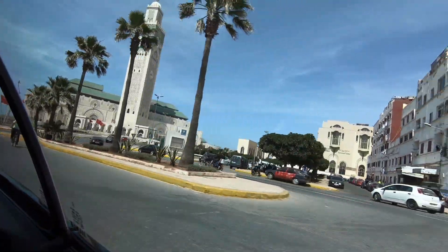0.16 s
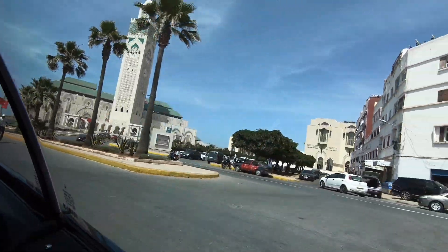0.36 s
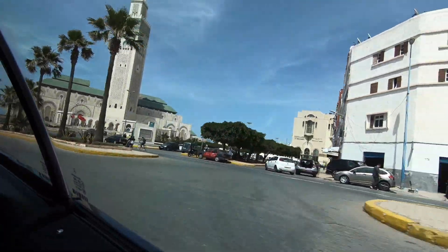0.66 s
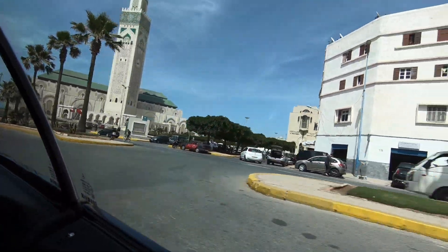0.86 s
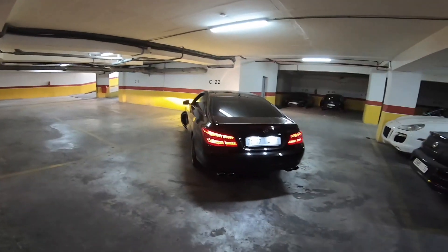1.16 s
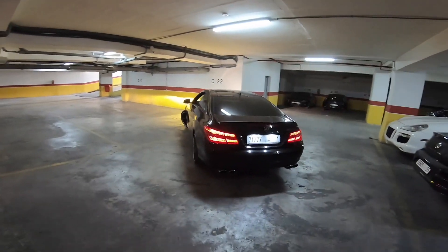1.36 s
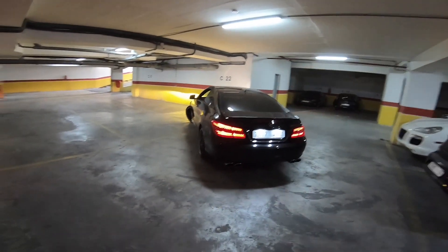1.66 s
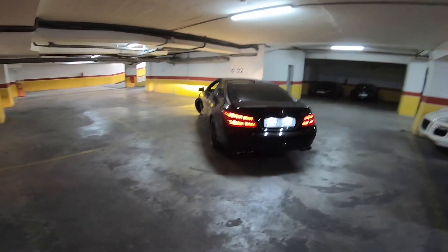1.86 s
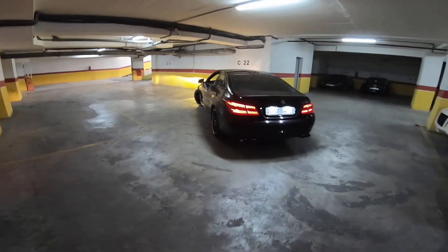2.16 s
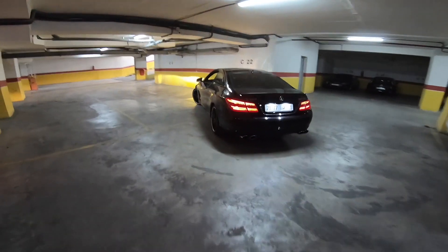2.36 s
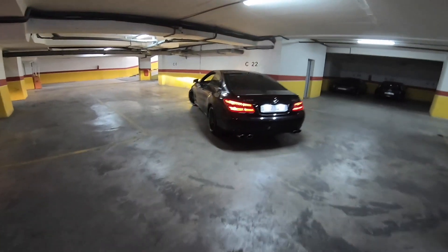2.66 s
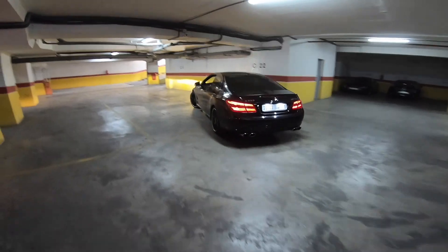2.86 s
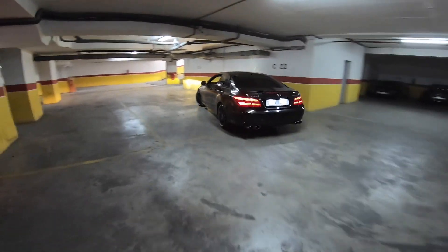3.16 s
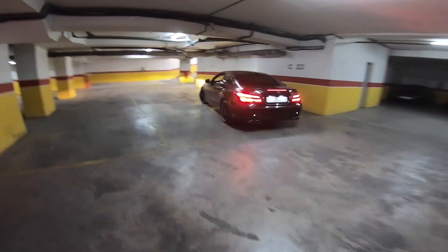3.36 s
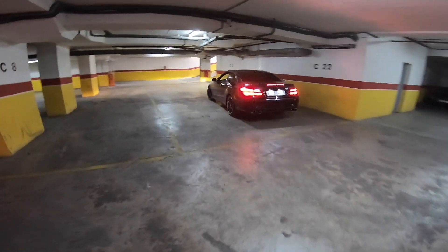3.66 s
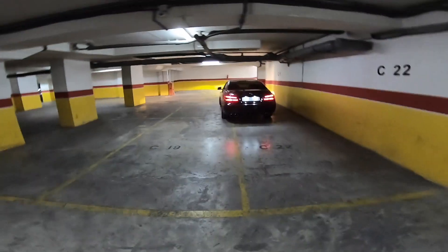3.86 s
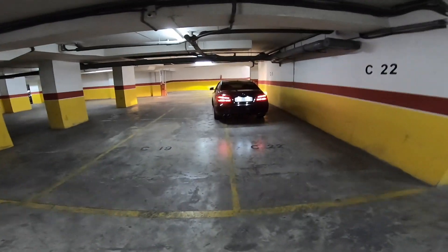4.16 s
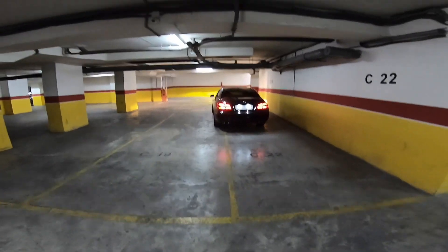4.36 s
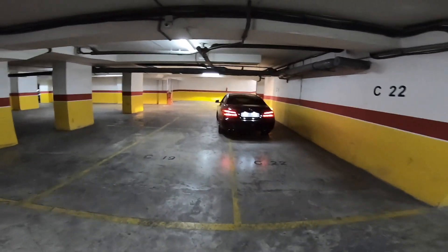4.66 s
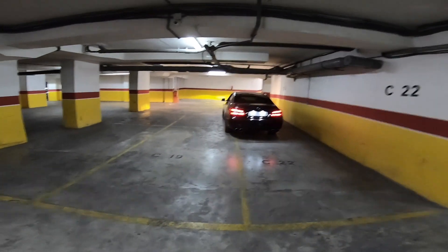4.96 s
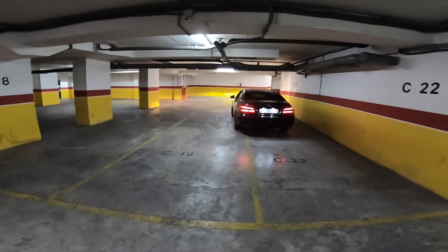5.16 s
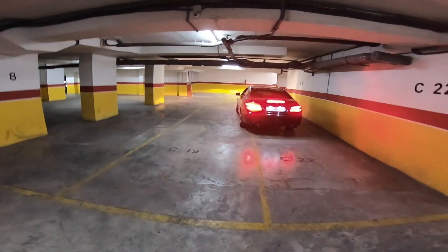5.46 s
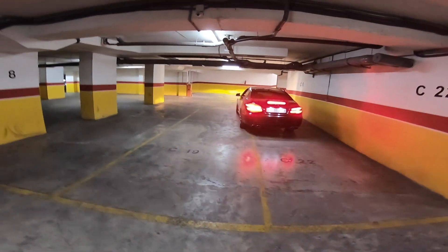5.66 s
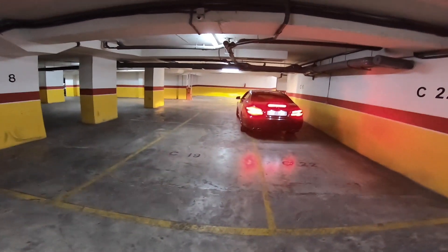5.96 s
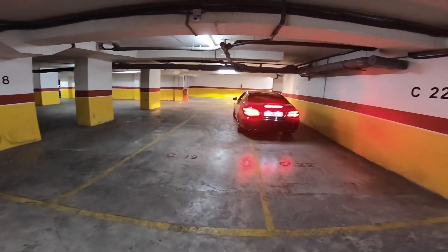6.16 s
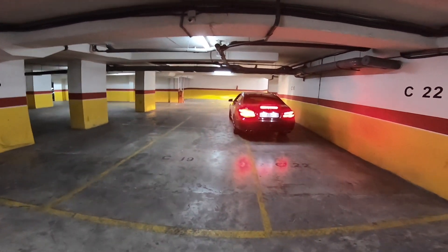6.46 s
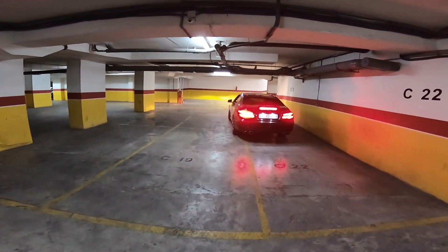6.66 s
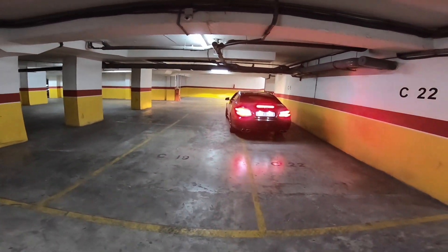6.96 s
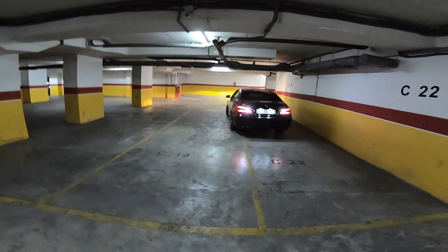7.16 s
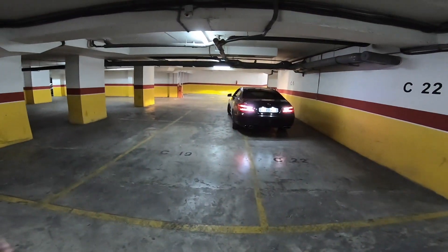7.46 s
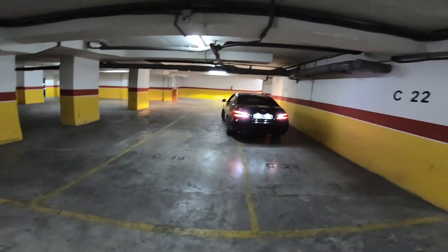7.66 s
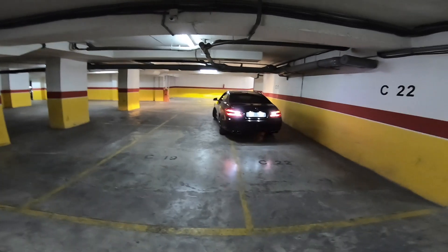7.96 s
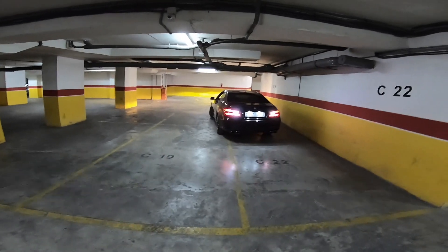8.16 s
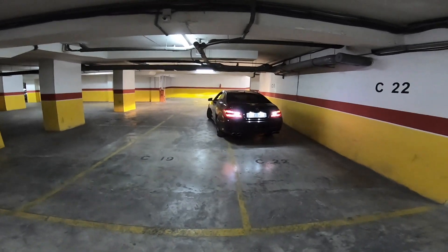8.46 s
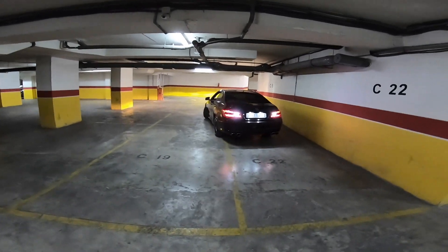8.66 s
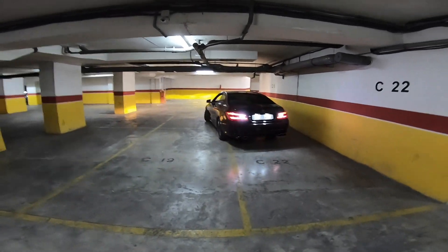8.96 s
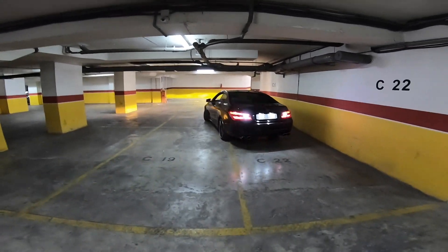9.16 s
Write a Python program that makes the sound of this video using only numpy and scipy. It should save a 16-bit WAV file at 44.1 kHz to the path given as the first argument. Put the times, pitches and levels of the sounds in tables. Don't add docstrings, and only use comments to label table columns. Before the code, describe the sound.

One second of road: loud low engine hum fading under buffeting wind, small rattles and one heavy microphone knock. Then, in a reverberant underground garage with a handheld microphone behind the car, a V8 burbles away, chirps its tyres and revs up. After a cut it stands farther off, idles, barks twice with crackling pops, winds down slowly and rumbles unevenly, with airy hiss and a faint whistle.

```python
import sys
import numpy as np
from scipy import signal
from scipy.fft import rfft, irfft, next_fast_len
from scipy.io import wavfile
from scipy.ndimage import uniform_filter1d, minimum_filter1d, map_coordinates

SR = 44100
rng = np.random.default_rng(int(sys.argv[2]) if len(sys.argv) > 2 else 0)


def linear_from_db(decibels):
    return 10 ** (np.asarray(decibels, float) / 20)


def waveform_to_disk(signal):
    frames = np.transpose(np.atleast_2d(signal))
    scaled = np.clip(frames, -1, 1) * 32767
    samples = np.round(scaled).astype(np.int16)
    wavfile.write(sys.argv[1], SR, samples)


N = 410571

# (frequency [Hz], density [dB per Hz])
STREET_LEVEL = [(0, -51), (.97, -50.5)]
STREET_SPECTRUM = [(350, -39), (600, -3), (843, -8.5), (933, -6), (1140, -13.5), (1280, -10), (1800, -20.5),
                   (6300, -44.5), (8500, -75), (19800, -120)]
# (time [s], level [dB])
WIND_STRENGTH = [(0, -26), (.12, -13), (.25, -19), (.38, -15.5), (.47, -19), (.66, -12.5), (.75, -13),
                 (0.831, -15), (0.972, -17)]
# (frequency [Hz], density [dB per Hz])
BUFFET_SPECTRUM = [(8, -39), (15, -12), (35, 6), (65, -1.5), (90, -26), (200, -120)]
FLAP_SPECTRUM = [(40, -58.5), (70, -8), (90, 5), (123, -7), (156, -2.5), (283, -22), (496, -32.5),
                 (600, -44.5), (900, -120)]
# (frequency [Hz], density [dB per Hz])
TRIM_RUSTLES = [(.31, .055, -67), (.46, 0.016, -71.5), (.65, 0.026, -71), (.74, 0.023, -71),
                (.8, .03, -67.5), (.89, 0.017, -66.5)]
TRIM_SPECTRUM = [(1800, -30), (3000, -6.5), (4500, 1), (6000, -3), (8200, -15.5), (9000, -60)]
# (time [s], push [dB], ripple [dB], snap [dB])
HOUSING_KNOCKS = [
    (.3, -40, -54, -56),
    (.45, -40, -60, -63),
    (.655, -40, -56, -61),
    (.737, -40, -54, -56),
    (.79, -40, -54, -58),
    (.825, -2.5, -20, -29),
    (.879, -40, -50, -54),
]
# (frequency [Hz], density [dB per Hz])
RUMBLE_LEVEL = [(.97, -31.5), (1.3, -33), (1.9, -35.5), (2.3, -38.5), (2.6, -48.5)]
RUMBLE_SPECTRUM = [(10, -25), (22, 0), (35, 11), (48, -8), (65, -56)]
# (frequency [Hz], width [Hz], level [dB])
BELT_LEVEL = [(.97, -56.5), (2, -63), (3.8, -66.5), (3.9, -54), (6.5, -62.5), (7.3, -60), (8, -58.5),
              (8.6, -50.5), (9.31, -53)]
BELT_RESONANCES = [(1760, 71, -5), (3167, 110, -6.5), (3870, 70, -16)]
# (time [s], level [dB])
FAN_LEVEL = [(.96, -43.5), (1.5, -45), (2.101, -49.5), (3.861, -50), (3.87, -46.5), (4.25, -47.5),
             (6.6, -52.5), (7.3, -48.5), (9.31, -44)]
# (time [s], level [dB])
SCRUB_LEVEL = [(2.75, -65), (2.92, -57), (3.0, -49), (3.18, -44.5), (3.3, -46.5), (3.42, -58), (3.6, -62)]
GRIND_LEVEL = [(4.5, -64), (4.6, -50.5), (4.68, -54.5), (4.76, -51.5), (4.84, -61)]
# (frequency [Hz], density [dB per Hz])
GRIND_SPECTRUM = [(1000, -29), (2200, -4.5), (3500, 2), (5000, -6.5), (7000, -6), (11000, -13),
                  (15500, -27.5)]
# (time [s], length [s], from [Hz], to [Hz], level [dB])
TYRE_SQUEAKS = [
    (2.555, .03, 1450, 2100, -46),
    (2.594, .025, 1520, 1480, -46),
    (2.61, .02, 1700, 1750, -49),
    (2.659, .016, 1760, 1740, -44),
]
# (time [s], peak [dB], lower part [dB])
PIPE_CRACKS = [(2.918, -48, 7), (3.021, -47, 7), (4.262, -42, 0), (4.272, -36, 3), (4.286, -40, 2),
               (4.352, -42, 5), (4.416, -41, 4), (4.464, -35, 0), (4.523, -36, 4), (4.576, -44, 2),
               (4.632, -45, 3), (4.68, -46, 2), (4.704, -40, 5), (4.755, -41, 4), (4.773, -42, 3),
               (4.795, -37, 3), (4.819, -38, 5), (4.839, -28, -3), (4.875, -27, -2), (4.906, -25.5, -2),
               (4.935, -31, 0), (4.95, -37, 0), (5.009, -40, 0), (6.59, -52, 5), (7.319, -46, -2)]
# (frequency [Hz], level [dB])
CRACK_SPECTRUM = [(600, -45), (1500, -3), (3200, -3.5), (4700, -8.5), (7000, -2.5), (10000, -14.5),
                  (15700, -33)]
# (frequency [Hz], density [dB per Hz])
GARAGE_DECAY = [(60, 1.2), (500, 1.48), (4000, 0.19), (12000, 0.07)]
GARAGE_DRONE = [(20, -36), (45, -11), (100, -1.5), (170, 3), (230, -4.5), (300, -17.5), (450, -62.5)]
# (time [s], cycle [Hz], level [dB]); cycle = firing rate / 8
ROAD_RUN = [
    (0, 31.73, -8.5),
    (.07, 30.58, -10),
    (.142, 31.63, -12.5),
    (.22, 30.47, -15),
    (.316, 29.96, -21.5),
    (.43, 29.3, -27.5),
    (.54, 27.8, -25.5),
    (.7, 27.8, -43),
    (.97, 26, -45),
]
# (multiple of the cycle [-], level [dB])
ROAD_ORDER_LEVELS = [(1, -11), (2, -24), (3, -2.5), (4, -0.5), (5, 0), (6, -7), (7, -28.5), (8, 3),
                     (9, -12), (10, -18), (11, -5.5), (12, -12), (13, -28.5), (14, -19.5), (15, -16),
                     (16, -17), (17, -25.5), (18, -33.5), (19, -26), (20, -30.5), (21, -32.5), (22, -42),
                     (23, -42.5), (24, -41)]
# (time [s], cycle [Hz], low part [dB], bark [dB])
CREEP_RUN = [(.962, 5.4, -17, -35.5), (1.3, 6.05, -18.3, -36), (1.5, 7.4, -15.7, -33.5),
             (1.65, 8, -14.3, -35), (1.8, 8.6, -14, -35), (1.95, 8.45, -15, -36.5),
             (2.1, 8.12, -15.8, -39.5), (2.3, 8, -15.5, -39.5), (2.53, 8.4, -14, -38)]
SPIN_RUN = [
    (2.58, 8.3, -14.5, -32),
    (2.64, 11.8, -10, -29),
    (2.7, 23.6, -15, -28.5),
    (2.87, 32.2, -17, -25),
    (3.02, 38.4, -14, -21),
    (3.249, 40.5, -16.5, -21.5),
    (3.5, 33, -17.5, -28.5),
    (3.7, 25, -19, -31),
    (3.875, 25.4, -20.5, -35.5),
]
FIRST_BLIP_RUN = [
    (3.865, 5.1, -18, -41),
    (4.1, 5.25, -21.5, -39.5),
    (4.22, 6.83, -15.5, -35.5),
    (4.28, 8.8, -11, -21.5),
    (4.42, 25.5, -12, -17),
    (4.52, 27.1, -15, -20.5),
    (4.66, 22.5, -13.5, -27),
]
SECOND_BLIP_RUN = [
    (4.72, 20.8, -14.5, -20.5),
    (4.8, 24.5, -15.5, -15.5),
    (4.92, 34, -17, -13),
    (5.001, 35.6, -20.5, -17.5),
    (5.12, 34.7, -14.5, -17),
    (5.35, 30, -16.5, -21.5),
    (5.7, 23, -16, -24),
    (6.05, 17, -16, -28),
    (6.75, 8.83, -18, -36.5),
]
IDLE_RUN = [(7, 6.7, -20, -38), (7.3, 5.5, -23.5, -40), (8.3, 5.2, -24.5, -38.7), (8.72, 5.2, -22, -37.5),
            (8.8, 5.3, -20, -35.5), (9.15, 6.8, -19.5, -36), (9.31, 6.8, -20.5, -37)]
# (times a cycle [-], level [dB])
BANK_PATTERN = [(1, -13), (2, -9), (3, 0), (4, -9)]
# (cycle [Hz], unevenness [-], scatter [-])
CYLINDER_SHARING = [(5.3, .55, 1.05), (6.3, .4, .65), (7.3, .25, .4), (7.9, .14, .28), (8.8, .14, .28),
                    (13, .6, .45), (22, 1.6, .55), (36, 2.2, .6)]
# (frequency [Hz], level [dB])
THROB_RESONANCE = [(12, -50), (25, -27), (44, -12), (60, -4), (72, 4.5), (83, -6), (96, -3), (115, -40),
                   (200, -120)]
BOOM_RESONANCE = [(60, -120), (85, -39.5), (98, -7), (113, -4), (129, 2), (143, -5), (160, -14), (185, -29),
                  (230, -61.5), (400, -120)]
# (time [s], level [dB])
THROB_OVER_BOOM = [(.96, -5.5), (1.52, 2.5), (1.8, -6.5), (2.2, 2), (2.5, 1), (2.75, -4), (3.2, -1.5),
                   (3.7, 0), (4.25, 2), (4.45, -7), (4.7, 0), (4.95, -7.5), (5.25, 0), (5.6, -4.5),
                   (6.1, -5), (6.75, 0), (7.3, 4), (8.7, 3), (9.31, 2)]
SPOT_BEHIND = (0.95, 1.045)
SPOT_BY_WALL = (0.9, 1.003)
# (frequency [Hz], level [dB])
BARK_LEAVING = [(100, -36.5), (170, -3.5), (211, -4.5), (260, -3), (317, -17), (405, -14), (456, -13.5),
                (534, -17), (705, -27), (1250, -36), (1800, -51.5), (2340, -67), (3960, -120)]
BARK_BLIPS = [(110, -28.5), (180, 1.5), (215, 0), (285, -1.5), (403, -8), (467, -5.5), (552, -7.5),
              (740, -13.5), (780, -14.5), (942, -15.5), (1210, -18), (1430, -25), (1570, -23),
              (1710, -28.5), (2200, -26.5), (2860, -58.5), (4840, -120)]
# (frequency [Hz], width [Hz], lift [dB])
PIPE_MODES = [(243, 20, 3.5), (348, 49, 1), (460.8, 22, 6), (524, 16, 4), (637, 18, 3.5), (740, 31, 3),
              (845, 24, 1), (1253, 21, 6)]
# (frequency [Hz], density [dB per Hz])
HISS_SPECTRUM = [(350, -38.5), (600, -10.5), (651, -4), (953, -3.5), (1060, -4), (1290, -7), (1580, -6),
                 (1960, -9), (3160, -11.5), (4620, -19.5), (6150, -14.5), (7640, -15.5), (11000, -37),
                 (14100, -48), (15500, -49.5)]
# (frequency [Hz], correlation [-])
PORT_LIKENESS = [(60, 0.99), (130, 0.98), (290, 1), (640, 0.68), (1410, 0.26), (3100, 0.64), (6820, 0.13),
                 (15000, -0.7)]
PORT_LIKENESS_ROAD = [(60, 1.0), (180, 1), (550, 1), (1650, 0.99), (4970, 0.94), (15000, 0.79)]
# (frequency [Hz], phase [rad])
PORT_LEVEL_GAP = [(60, -2.5), (110, -2.5), (200, -3), (380, -5.5), (700, -4.5), (1290, 2), (2380, 0),
                  (4400, 0.0), (8120, 0), (15000, -2)]
PORT_PHASE_GAP = [(100, 0), (520, 0.11), (950, 1.54), (2400, .3), (6000, 0.024)]


def unit(x):
    return x / np.sqrt(np.mean(x ** 2) + 1e-20)


def along(points, hz):
    f, v = np.transpose(points)
    return np.interp(np.log(hz + 1), np.log(f + 1), v)


def curves(rows):
    s, *cols = np.transpose(rows)
    first, last = round(s[0] * SR), min(N, round(s[-1] * SR))
    t = np.arange(first, last) / SR
    return first, [np.interp(t, s, c) for c in cols]


def placed(first, sound):
    t = np.arange(sound.shape[-1])
    fade_in = np.clip(t / (.01 * SR), 0, 1) if first else 1
    fade_out = np.clip(t[::-1] / (.01 * SR), 0, 1) if first + len(t) < N else 1
    return np.pad(sound * fade_in * fade_out, ((0, 0), (first, N - first - len(t))))


def filtered(x, response):
    m = next_fast_len(x.shape[-1] + 8192)
    spectrum = rfft(x, m) * response(np.fft.rfftfreq(m, 1 / SR))
    return irfft(spectrum, m)[..., :x.shape[-1]]


def coloured(x, spectrum):
    return filtered(x, lambda hz: linear_from_db(along(spectrum, hz)))


def wobble(n, rate):
    knots = rng.standard_normal(int(n * rate / SR) + 4)
    return map_coordinates(knots, [np.arange(n) * rate / SR])


def steady(x, span=0.19):
    power = uniform_filter1d(x ** 2, int(span * SR), -1)
    power = uniform_filter1d(power, int(span * SR / 2), -1)
    return x / np.sqrt(np.abs(power) + 1e-12)


def rush(rows, spectra, lumpy_db, rate):
    first, levels = curves(rows)
    total = 0
    for db, spectrum in zip(levels, spectra):
        lumps = linear_from_db(lumpy_db * wobble(len(db), rate))
        noise = lumps * rng.standard_normal((2, len(db)))
        total = total + linear_from_db(db) * steady(coloured(noise, spectrum), span=0.057)
    return placed(first, total)


def tails(seconds):
    noise = rng.standard_normal((2, int(seconds * SR)))
    hz, t, z = signal.stft(noise, SR, nperseg=512)
    decay = linear_from_db(-60 * t / along(GARAGE_DECAY, hz)[:, None])
    tail = signal.istft(z * decay, SR, nperseg=512)[1]
    return tail / np.linalg.norm(tail, axis=1, keepdims=True)


def ports(pair, alike, level_gap, phase_gap):
    def mixing(hz):
        angle = np.arccos(np.clip(along(alike, hz), -1, 1)) / 2
        return np.array([np.cos(angle), np.sin(angle)])

    def tilt(hz):
        half = linear_from_db(along(level_gap, hz) / 2) * np.exp(.5j * along(phase_gap, hz))
        return np.array([half, 1 / half])

    mid, side = filtered(pair, mixing)
    return filtered(np.array([mid + side, mid - side]), tilt)


def street():
    return rush(STREET_LEVEL, [STREET_SPECTRUM], lumpy_db=1.5, rate=20)


def wind():
    buffet_db, buffet_db_per_s = -9, 8.5
    rows = [(s, db + buffet_db + buffet_db_per_s * s, db) for s, db in WIND_STRENGTH]
    return rush(rows, [BUFFET_SPECTRUM, FLAP_SPECTRUM], lumpy_db=.6, rate=12)


def rustle():
    t = np.arange(N) / SR
    swell = sum(linear_from_db(db) * np.exp(-((t - s) / half) ** 2) for s, half, db in TRIM_RUSTLES)
    grains = linear_from_db(2.2 * wobble(N, 150)) * rng.standard_normal((2, N))
    return swell * unit(coloured(grains, TRIM_SPECTRUM))


def knocks():
    out, t = np.zeros(N), np.arange(-200, 200) / SR
    for s, push_db, ripple_db, snap_db in HOUSING_KNOCKS:
        push = -linear_from_db(push_db) * np.exp(-(t / .0011) ** 2) * np.cos(2 * np.pi * 260 * t)
        ripple = np.exp(-((t + .0007) / .0007) ** 2) * np.cos(2 * np.pi * 950 * (t + .0011))
        snap_wave = np.cos(2 * np.pi * 2700 * t + rng.uniform(0, 6))
        snap = linear_from_db(snap_db) * np.exp(-(t / .00016) ** 2) * snap_wave
        out[round(s * SR) - 200:][:400] += push + linear_from_db(ripple_db + 6) * ripple + snap
    return np.array([out, .1 * out])


def rumble():
    return rush(RUMBLE_LEVEL, [RUMBLE_SPECTRUM], lumpy_db=4.0, rate=6)


def belt():
    first, (db,) = curves(BELT_LEVEL)

    def resonances(f):
        return sum(linear_from_db(g) * 1j * f * w / (c * c - f * f + 1j * f * w) for c, w, g in BELT_RESONANCES)

    sound = filtered(rng.standard_normal((2, len(db))), resonances)
    return placed(first, linear_from_db(db + 1.4 * wobble(len(db), 12)) * unit(sound))


def tyre_scrub():
    scrub_spectrum = [(1500, -25), (2400, -12.0), (3050, -5.5), (3700, -11.0), (5500, -39.0)]  # Hz, dB per Hz
    scrub = rush(SCRUB_LEVEL, [scrub_spectrum], lumpy_db=2, rate=69)
    return scrub + rush(GRIND_LEVEL, [GRIND_SPECTRUM], lumpy_db=3.5, rate=49)


def squeaks():
    out = np.zeros(N)
    for s, length, from_hz, to_hz, db in TYRE_SQUEAKS:
        u = np.arange(round(length * SR)) / (length * SR)
        hz = from_hz + (to_hz - from_hz) * u ** 2 + 60 * wobble(len(u), 300)
        tone = np.sin(2 * np.pi * np.cumsum(hz) / SR)
        out[round(s * SR):][:len(u)] += linear_from_db(db) * np.sin(np.pi * u) * tone
    return np.array([out, .6 * np.roll(out, 90)])


def cracks():
    out, t = np.zeros((2, N)), np.arange(1800) / SR
    shape = linear_from_db(-60 * t / .03) * (1 - np.exp(-t / .0006))
    for s, db, low_db in PIPE_CRACKS:
        burst = shape * rng.standard_normal((2, len(t))) * [[1], [.5]]
        balance = [(2500, np.clip(low_db, -8, 8)), (5000, 0)]
        out[:, round((s - .002) * SR):][:, :1800] += linear_from_db(db) * coloured(burst, balance)
    out = linear_from_db(15.5) * coloured(out, CRACK_SPECTRUM)
    return out + linear_from_db(0.5) * signal.fftconvolve(out, tails(0.98), axes=1)[:, :N]


def road_engine():
    first, (cycle_hz, db) = curves(ROAD_RUN)
    turn = 2 * np.pi * np.cumsum(cycle_hz) / SR
    loss_db = .05 * np.clip(db[0] - db, 0, 30)
    lines = 0
    for k, level_db in ROAD_ORDER_LEVELS:
        sway_db = 2.1 * wobble(len(db), 14.2) - loss_db * k
        lines = lines + linear_from_db(level_db + sway_db) * np.cos(k * turn - 2.2 * (k % 4) ** 2)
    return placed(first, linear_from_db(db - 2.5) * lines * [[1], [.05]])


def firings(cycle_hz):
    speeds, *sharing = np.transpose(CYLINDER_SHARING)
    uneven, scatter = [np.interp(cycle_hz, speeds, column) for column in sharing]
    scatter = scatter + .35 * np.clip(-np.gradient(cycle_hz) * SR / 10, 0, 1)
    scatter = np.clip(scatter, 0, 1.4)
    count = np.cumsum(8 * cycle_hz / SR)
    at = np.flatnonzero(np.diff(np.floor(count))) + 1
    turn = 2 * np.pi * np.floor(count[at]) / 8
    pattern = sum(linear_from_db(db) * np.cos(k * turn + k * k) for k, db in BANK_PATTERN)
    pulses = np.zeros(len(count))
    pulses[at] = 1 + uneven[at] * pattern + scatter[at] * rng.standard_normal(len(at))
    puff = signal.lfilter([1], [1, -np.exp(-1 / (0.022 * SR))], np.abs(pulses))
    return pulses, unit(puff)


def throb_and_boom(low, t, spot):
    drone = linear_from_db(-16) * unit(coloured(rng.standard_normal(low.shape), GARAGE_DRONE))
    throb = coloured(low, np.multiply(THROB_RESONANCE, [spot[0], 1]))
    boom = coloured(low, np.multiply(BOOM_RESONANCE, [spot[1], 1]))
    lead = linear_from_db(np.interp(t, *np.transpose(THROB_OVER_BOOM)))
    return drone + steady(lead * throb + boom)


def exhaust_rasp(high, puff, bark_db, bark, gas):
    gas_noise = rng.standard_normal(high.shape) * (1 + puff)
    rasp = steady(steady(coloured(high, bark)) + gas * steady(coloured(gas_noise, bark)))

    def pipe(f):
        return sum((linear_from_db(g) - 1) / (1 + (2 * (f - c) / w) ** 2) for c, w, g in PIPE_MODES)

    rasp = rasp + np.clip((bark_db + 35) / 11, 0, 1) * filtered(rasp, pipe)
    opening = linear_from_db(0.13 * (bark_db + 23.5)) - 1
    return steady(rasp + opening * filtered(rasp, lambda hz: hz > 340))


def flow_and_fans(puff, t, bark_db, gated, flow_db):
    flow = linear_from_db(-45 + flow_db + 1.23 * (bark_db + 24))
    keep = np.exp(-1 / (0.047 * SR))
    flow = np.maximum(flow, signal.lfilter([1 - keep], [1, -keep], flow))
    fans = linear_from_db(np.interp(t, *np.transpose(FAN_LEVEL)))
    hiss = np.hypot(fans, flow)
    flutter = linear_from_db(2.1 * wobble(len(t), 6)) * (1 + gated * puff)
    air = unit(coloured(rng.standard_normal((2, len(t))) * steady(flutter), HISS_SPECTRUM))
    opening = linear_from_db(0.46 * (20 * np.log10(hiss) + 51.0)) - 1
    return hiss * (air + opening * filtered(air, lambda hz: hz > 9500))


def engine(rows, bark, wet_db, gas, gated, flow_db, spot):
    first, (cycle_hz, level_db, bark_db) = curves(rows)
    n = len(cycle_hz)
    t = (first + np.arange(n)) / SR
    pulses, puff = firings(cycle_hz)
    echoes = signal.fftconvolve(pulses[None], tails(1.2), axes=1)[:, :n]
    direct = pulses * [[1], [0]]
    low = direct + linear_from_db(wet_db) * echoes
    high = direct + linear_from_db(wet_db + 10) * echoes
    lows = linear_from_db(level_db) * throb_and_boom(low, t, spot)
    rasp = linear_from_db(bark_db) * exhaust_rasp(high, puff, bark_db, bark, gas)
    return placed(first, lows + rasp + flow_and_fans(puff, t, bark_db, gated, flow_db))


def scene():
    road = street() + wind() + rustle() + knocks() + road_engine()
    leaving = engine(CREEP_RUN + SPIN_RUN, BARK_LEAVING, wet_db=-16, gas=1.0, gated=.15, flow_db=-1,
                     spot=SPOT_BEHIND)
    blips = engine(FIRST_BLIP_RUN + SECOND_BLIP_RUN + IDLE_RUN, BARK_BLIPS, wet_db=-8, gas=.65, gated=.3,
                   flow_db=0, spot=SPOT_BY_WALL)
    garage = rumble() + belt() + tyre_scrub() + squeaks() + cracks() + leaving + blips
    road_heard = ports(road, PORT_LIKENESS_ROAD, [(100, 0)], [(100, 0)])
    return road_heard + ports(garage, PORT_LIKENESS, PORT_LEVEL_GAP, PORT_PHASE_GAP)


def low_pass(x):
    return signal.sosfilt(signal.butter(12, 15710, fs=SR, output="sos"), x)


def record(dry):
    need = np.minimum(1, .99 / (np.abs(dry).max(0) + 1e-9))
    gain = uniform_filter1d(minimum_filter1d(need, size=401), size=400)
    return low_pass(dry * gain)


dry = scene()
out = record(dry)
waveform_to_disk(out)
```